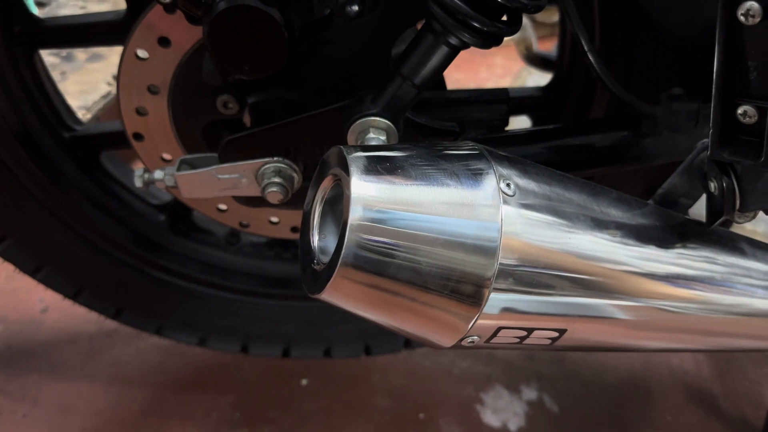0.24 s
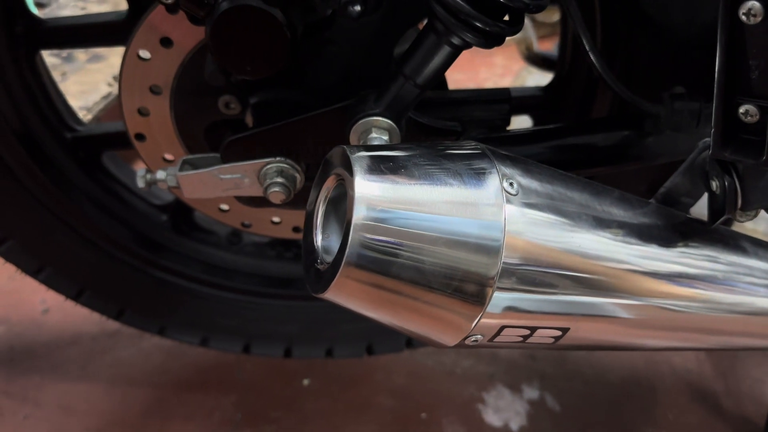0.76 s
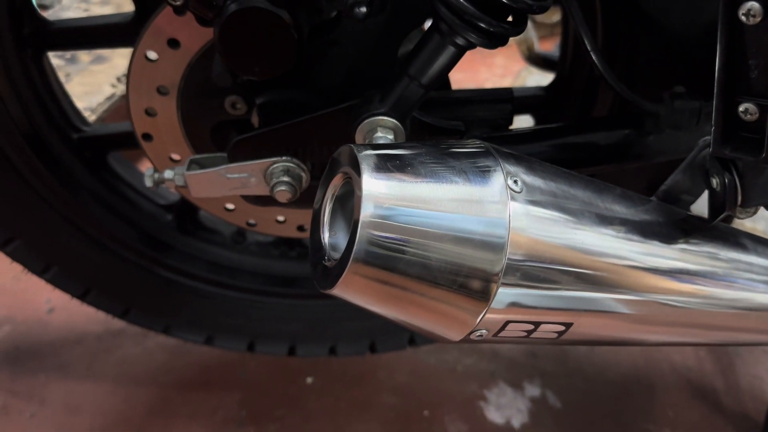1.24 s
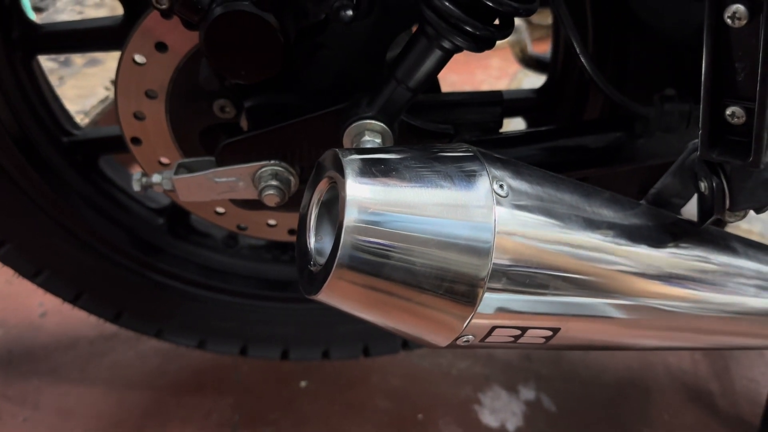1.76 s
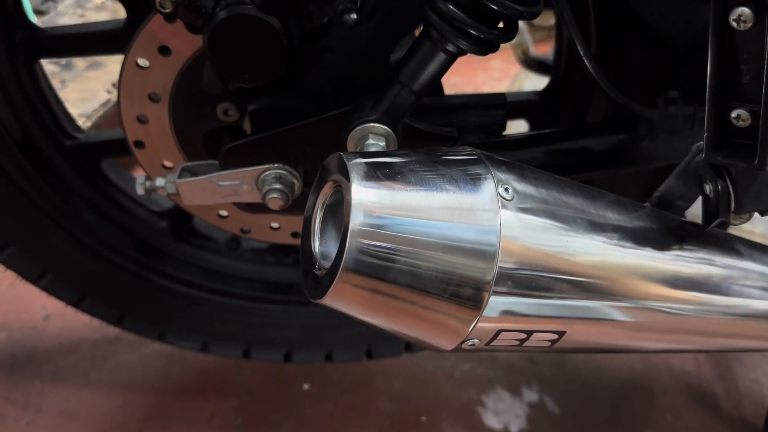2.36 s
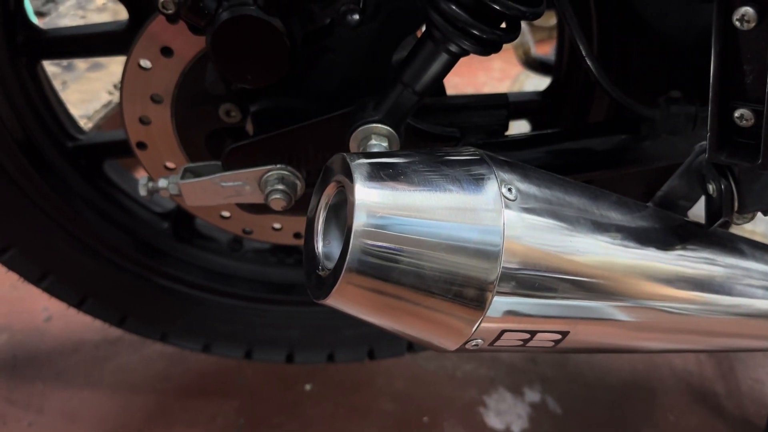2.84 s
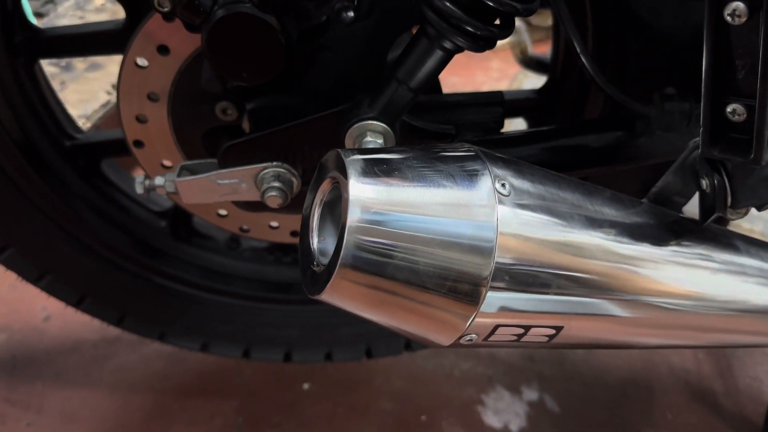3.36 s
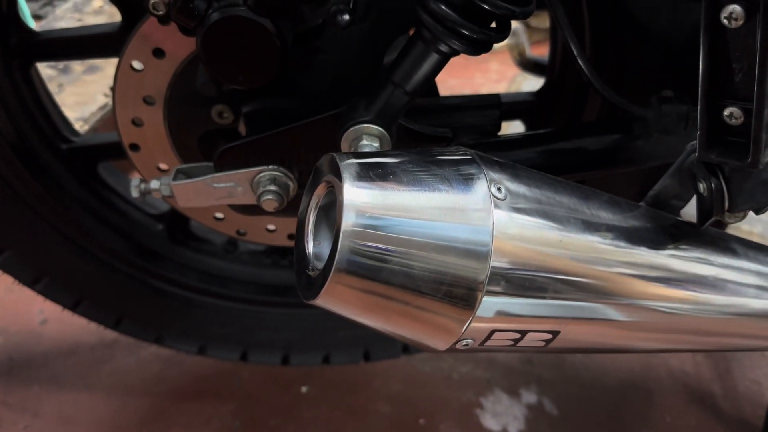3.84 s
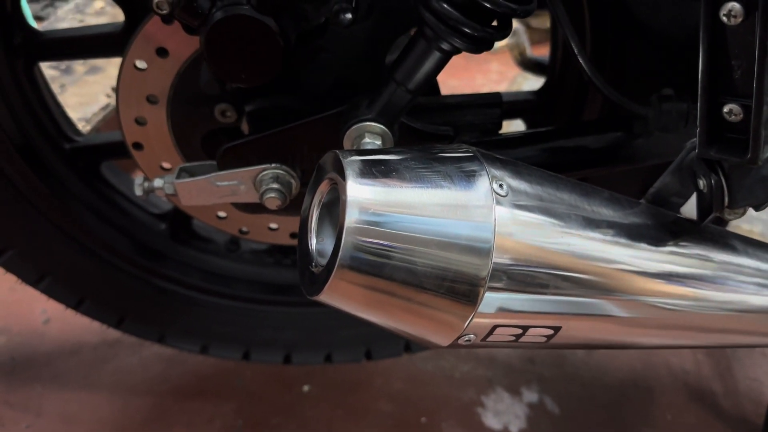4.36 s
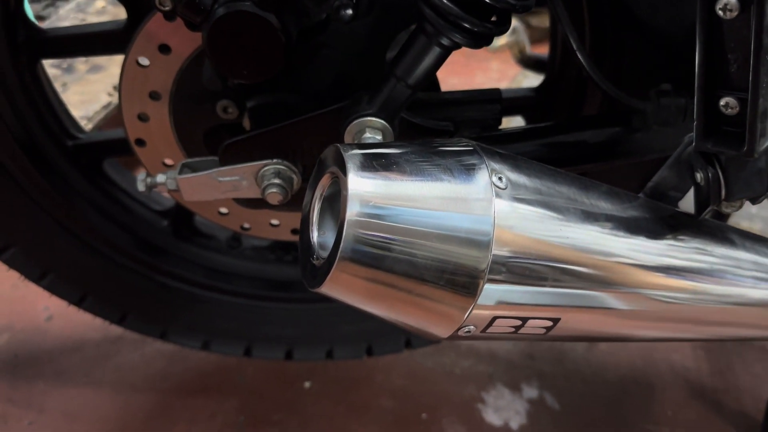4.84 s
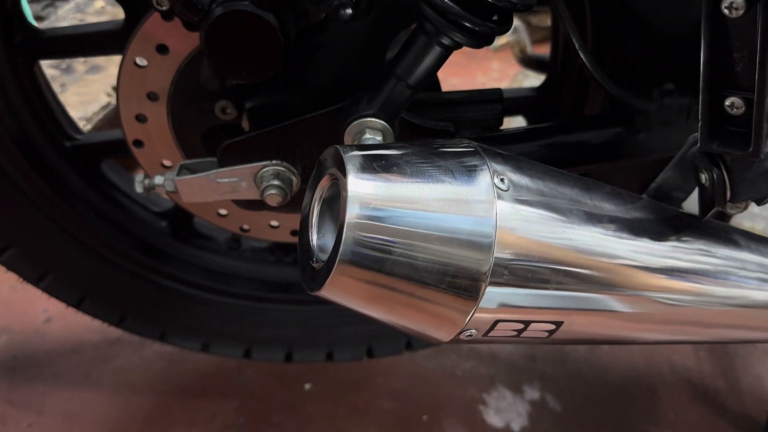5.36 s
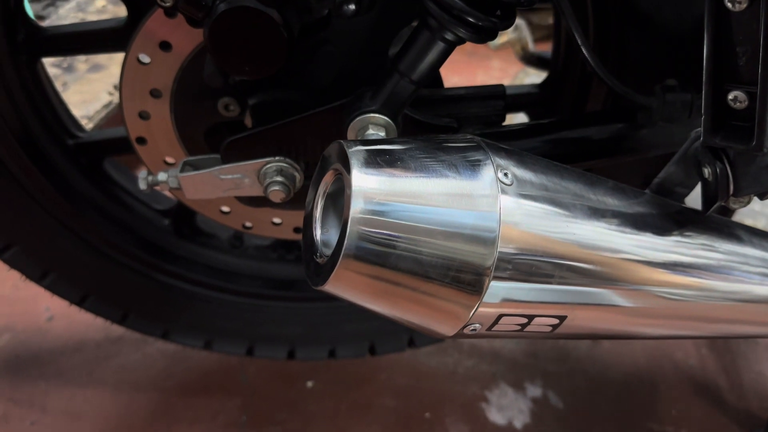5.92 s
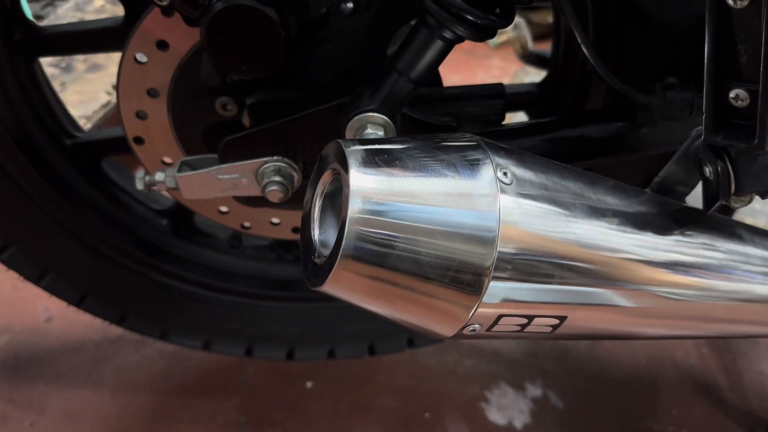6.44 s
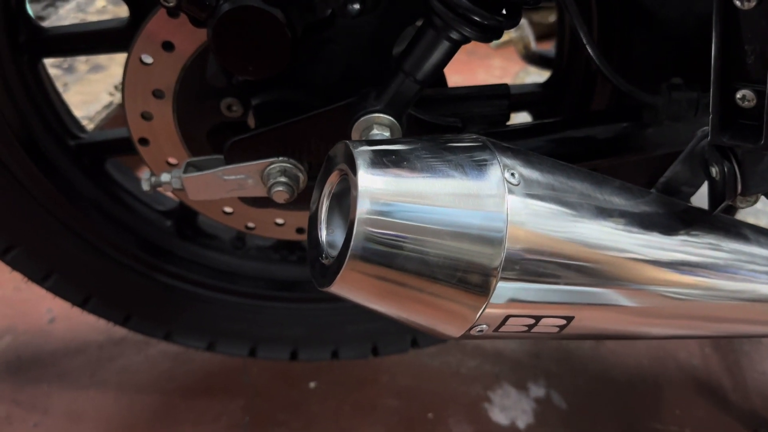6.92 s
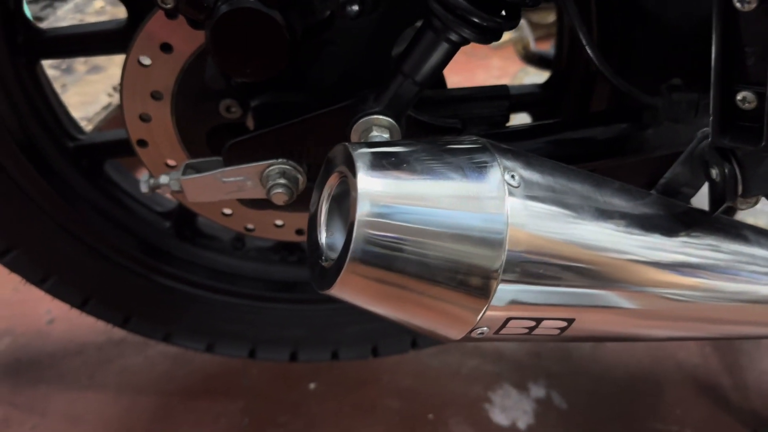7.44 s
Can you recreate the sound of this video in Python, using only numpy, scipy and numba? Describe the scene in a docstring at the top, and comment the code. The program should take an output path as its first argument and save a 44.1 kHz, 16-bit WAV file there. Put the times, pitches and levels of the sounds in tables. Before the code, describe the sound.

A single-cylinder motorcycle exhaust thumps at slow idle, climbs to a steady drumming fast idle, then barks through two quick throttle blips.

```python
"""A single-cylinder motorcycle exhaust ticks over in a workshop, is held at a fast idle, then blipped twice.
Each firing is a blow-down pulse that rings the pipe and silencer; thump and bark return once from the far end.
A slower pumping note and intake gulp lie under it, gas puffs out at each firing and the valve gear rattles.
The walls answer with a short thin tail, without deep bass. A phone by the tailpipe hears it at two ports,
and its bass filters delay the lows so that each thump becomes a falling chirp."""
import sys
import numpy as np
from scipy import signal
from scipy.fft import rfft, irfft
from scipy.io import wavfile
from numba import njit

SR = 44100
rng = np.random.default_rng(int(sys.argv[2]) if len(sys.argv) > 2 else 0)


def output_pcm(signal):
    """Save a mono or channel-first signal as 16-bit PCM at the path in sys.argv[1].

    Samples are clipped to [-1, 1] before scaling.
    """
    pcm = np.clip(np.atleast_2d(signal).T, -1, 1) * 32767
    wavfile.write(sys.argv[1], SR, np.round(pcm).astype(np.int16))


N = 339129

# Engine speed. Each row: time in seconds, firings per second.
SPEED = [(0.0, 13.47), (1.04, 13.24), (1.2, 12.55), (1.39, 14.07), (1.45, 16.6), (1.77, 23.55),
         (2.1, 28.56), (2.59, 28.81), (2.9, 28.32), (3.38, 29.18), (3.87, 28.32), (4.33, 29.55),
         (5.04, 28.61), (5.34, 29.1), (5.91, 28.03), (6.54, 28.62), (6.66, 41.44), (6.77, 54.68),
         (7.1, 38.26), (7.25, 38.8), (7.46, 58.26), (7.56, 65.26), (7.69, 58.53)]
FIRST_FIRING = .26  # share of a cycle before the first firing
FAST_IDLE_HZ, TICKOVER_HZ = 28.7, 15  # firing rates: reference for octaves of speed, upper bound of tick-over
# Each time in seconds marks a lurch where the firings slip late by a share of a cycle.
SLIP_AT_S, SLIP_SHARE, SLIP_TAKES_S = (6.8, 7.594), .24, .04
FIRING_ADVANCE_S = 0.004455  # all firings and puffs are moved this much earlier

# Throttle and levels. Each row: time in seconds, throttle 0-1, exhaust level in dB, valve gear level in dB.
THROTTLE = [(0, 0.05, -1.5, -47), (1.37, 0.09, -1.6, -47.5), (1.45, 0.47, 2.5, -42),
            (1.75, 0.45, 1.5, -45.5), (1.95, 0.48, 2.5, -36), (2.18, 0.31, 1.5, -41.5),
            (3.5, 0.24, 0.63, -42.5), (6.5, 0.26, -2, -45.5), (6.57, 0.63, 0.5, -48),
            (6.68, 0.97, -0.9, -45), (6.77, 0.77, 0.1, -38), (6.83, 0.62, 0.4, -38), (7.08, 0.66, 0, -49),
            (7.19, 0.58, -6.5, -43), (7.3, 0.75, 0.8, -60), (7.45, 0.89, -1, -32), (7.55, 0.75, -1, -33),
            (7.61, 0.71, -2.7, -39), (7.69, 0.57, -0.5, -39)]
# Effect of the throttle. Each row: throttle 0-1, boom in dB, thump in dB, bark in dB, snap in dB,
# gas puff in dB, top of the pulse in Hz, pumping in dB, gulp in dB.
LOAD = [(0, -15, -18, -28.5, -30, -52, 464, -14.5, -37),
        (.3, -18.5, -13.5, -23, -28.5, -49, 569, -19.5, -32),
        (.6, -16, -14.5, -17.5, -26.5, -36, 720, -22.5, -28),
        (1, -12.5, -22.5, -15.5, -15.5, -22.5, 926, -22.5, -3)]

# Spread from firing to firing, as standard deviations: lows in dB, highs in dB, puff in dB, lateness in ms.
SCATTER = (.5, .9, 1.6, .06)
# Misfires and weak firings. Each row: time in seconds, change of lows in dB, of highs in dB, of puff in dB,
# lateness in ms.
MISFIRES = [(.09, -2.5, -15, -5.5, -0.5), (1.065, -6.5, -19, -6, 5), (3.004, -5, -29, -6.5, 1.8),
            (3.592, 0.5, -23, 11.5, 9.5), (3.731, -3.5, -4.5, -13, 4.5), (4.87, -7, -14, -4.5, 6.5),
            (5.563, -5, -28, -10, 3.5), (5.915, -5.5, -5, -11.5, 6), (7.171, 3.5, -32, -1, 7.5),
            (7.584, 7, -31, -7, 8)]
# Alternate firings at tick-over, a strong one after each misfire: lows, highs and puff in dB.
STRONG_DB, WEAK_DB = (2, -2, 7), (1.5, -9.5, 4)
# Firings that spit as the throttle opens. Each row: time in seconds, extra puff in dB.
CRACKS = [(1.653, 5), (1.743, 7), (6.579, 3)]

# Boom mode of the pipe at the fast idle.
BOOM_HZ, BOOM_WIDTH_HZ = 92.54, 21.8
# Silencer modes at the fast idle: thump, bark and snap. Each row: centre in Hz, width in Hz.
SILENCER = [(145, 104.4), (320, 133), (500, 338)]
# Signs of boom, thump, bark and snap: neighbouring modes swing in opposite senses at the outlet.
POLARITY = (-1, 1, -1, 1)
HEAT_PER_OCTAVE = 0.12  # hotter, faster gas raises the modes by this share per octave of speed
SILENCER_RISE = 0.018  # above the fast idle the silencer modes climb only this share per octave
BOOM_DB_PER_OCTAVE, PUMPING_DB_PER_OCTAVE = -14, 9  # above the fast idle pumping takes over from the boom
# Round trip along the pipe: a fixed part, and a part at the fast idle that falls with the square of speed.
TRIP_MS, SLOW_TRIP_MS, RETURN_DB = 16.99, 1.8, -18
NOTCH_HZ, NOTCH_WIDTH_HZ = 229, 21.6  # hollow between thump and bark, at the fast idle
# Hollow, deepest at light throttle. Each row: throttle 0-1, depth 0-1.
HOLLOW = [(0, 0), (.3, .95), (.5, .3), (1, 0)]
# One bounce between the baffles, delay and centre at the fast idle.
BAFFLE_MS, BAFFLE_DB, BAFFLE_HZ, BAFFLE_WIDTH_HZ = 6.294, -7, 540, 174
PUMPING_LAG, GULP_LAG = 0.72, 0.42  # lags in periods, the first at or below the fast idle
PUMPING_LAG_PER_OCTAVE = 0.24  # extra lag in periods above the fast idle
THUD_HZ, THUD_WIDTH_HZ, THUD_DB = 52.9, 15.6, 10.5  # deep thud under the exhaust

# Valve gear spectrum common to both ports. Each row: frequency in Hz, relative level in dB per Hz.
GEAR = [(450, -4), (700, -0.5), (850, -2.5), (1400, -4.5), (1550, 0.5), (1700, -10.5), (2400, -10),
        (2710, -11), (3000, -13.5), (3750, -14.5), (3980, -11), (4250, -15), (6000, -24.5), (7400, -16),
        (8400, -16.5), (9900, -23), (10900, -64.5), (12300, -23.5), (14500, -17.5), (15600, -26.5),
        (16200, -42.5)]
# Valve gear spectrum opposite at the ports. Each row: frequency in Hz, relative level in dB per Hz.
GEAR_SIDE = [(410, -32), (700, 1), (1040, -3.5), (1540, 4.5), (2170, -13.5), (2750, 0), (4410, -38.5),
             (7360, -15), (8620, -25.5), (11400, -11), (16200, -29)]
# Valve events. Each row: place in the cycle 0-1, relative strength.
TAPPETS = [(.45, .4), (.82, .6)]
# Gas spectrum common to both ports. Each row: frequency in Hz, relative level in dB per Hz.
GAS = [(530, -58.5), (900, -5), (1510, -12.5), (1630, -17.5), (1860, -9.5), (2150, -14.5), (2740, -13.5),
       (3450, -21.5), (8430, -24), (10600, -42.5), (14500, -16.5), (16200, -41.5)]
# Gas spectrum opposite at the ports. Each row: frequency in Hz, relative level in dB per Hz.
GAS_SIDE = [(530, -36), (900, 3), (1250, -0.5), (2100, -3.5), (2810, -2.5), (4340, -8.5), (4780, -10.5),
            (7290, -10), (8430, -26.5), (11400, -7.5), (16200, -40.5)]
PUFF_SHARE, PUFF_RISE, STREAM = 0.25, 0.068, 0.075  # decay and rise in cycles; steady flow under the puffs

SHOP_T60_S, SHOP_DB = .5, -14
# Port imbalance. Each row: frequency in Hz, left minus right in dB.
LEAN = [(60, .4), (125, .6), (250, 1), (500, 2.2), (1400, 1.5), (2800, 3), (5500, 4.5), (9000, .4),
        (16000, .2)]
BASS_CUT_HZ, TOP_HZ = 56, 15800
# Corner of each all-pass stage in Hz.
SMEAR_HZ = (103, 142, 300, 308)


def undb(db):
    """Amplitude gain follows from decibels as a power of ten."""
    return 10 ** (np.asarray(db) / 20)


def level(x, db):
    """Normalisation by the root mean square sets the level of a signal."""
    return x * undb(db) / np.sqrt(np.mean(x ** 2))


def curve(table, x):
    """Linear interpolation reads every column of a table at x along its first column."""
    at, *columns = np.transpose(table)
    return [np.interp(x, at, c) for c in columns]


def on_hz(table):
    """Interpolation over log frequency reads a spectrum at every FFT bin."""
    hz, value = np.transpose(table)
    return np.interp(np.log(np.fft.rfftfreq(N, 1 / SR) + 1), np.log(hz + 1), value)


def coloured(table, x):
    """Multiplication of the spectrum by a gain curve colours a signal."""
    return irfft(rfft(x) * undb(on_hz(table)), N)


@njit
def svf(x, hz, width, low):
    """Two coupled integrators resonate at a moving centre: band-pass at low 0, low-pass at low 1."""
    y, b, l = np.empty(len(x)), 0., 0.
    for i in range(len(x)):
        g, k = np.tan(np.pi * hz[i] / SR), width[i] / hz[i]
        v = (b + g * (x[i] - l)) / (1 + g * (g + k))
        y[i] = low * (l + g * v) + (1 - low) * k * v
        b, l = 2 * v - b, l + 2 * g * v
    return y


def resonance(x, hz, width):
    """A single mode passes a band of constant width about its fixed or moving centre."""
    return svf(x, hz + np.zeros(N), width + np.zeros(N), 0.)


def train(times, sizes):
    """Impulses excite a resonator at each given time."""
    at = np.round(times * SR).astype(int)
    ok = (at >= 0) & (at < N)
    return np.bincount(at[ok], sizes[ok], N) + 1e-18


def crank():
    """Integrated speed gives the cycle phase; each whole cycle fires once, with its own row of changes."""
    t = np.arange(N) / SR
    slip = sum(np.clip((t - s) / SLIP_TAKES_S + .5, 0, 1) for s in SLIP_AT_S)
    cycles = np.cumsum(curve(SPEED, t)[0]) / SR + 1 - FIRST_FIRING - SLIP_SHARE * slip
    times = np.interp(np.arange(int(cycles[-1]) + 1), cycles, t)
    times[0] = times[1] - 1 / SPEED[0][1]
    change = rng.standard_normal((len(times), 4)) * SCATTER
    missed = [np.argmin(abs(times - s)) for s, *_ in MISFIRES]
    for k in np.flatnonzero(curve(SPEED, times)[0] < TICKOVER_HZ):
        since = k - max([0] + [m for m in missed if m < k])
        change[k, :3] += STRONG_DB if since % 2 else WEAK_DB
    for k, (s, *row) in zip(missed, MISFIRES):
        change[k] = row
    for s, db in CRACKS:
        change[np.argmin(abs(times - s)), 2] += db
    return cycles % 1, times - FIRING_ADVANCE_S + change[:, 3] / 1000, change


def shop(x):
    """Diffuse reflection from the walls is a decaying noise tail without deep bass, independent at each port."""
    t = np.arange(int(.5 * SR)) / SR
    tail = rng.standard_normal((2, len(t))) * undb(-60 * t / SHOP_T60_S) * (t > .006)
    tail = signal.sosfilt(signal.butter(1, 220, "high", fs=SR, output="sos"), tail)
    wet = signal.fftconvolve(x[None], tail, axes=1)[:, :N]
    return wet * undb(SHOP_DB) / np.sqrt(np.mean(np.sum(tail ** 2, axis=1)))


def ports(common, opposite, side_db, envelope):
    """Partly coherent noise at two ports is a shared part plus a part of opposite sign."""
    mid = level(coloured(common, envelope * rng.standard_normal(N)), 0)
    side = level(coloured(opposite, envelope * rng.standard_normal(N)), 0)
    return mid + undb(side_db) * side * np.array([[1], [-1]])


def valve_gear(phase):
    """Mechanical contact noise rustles steadily and swells into a tick at each valve event."""
    t = np.arange(N) / SR
    gear_db = curve(THROTTLE, t)[2]
    ticks = 1 + sum(g * np.exp(-((phase - at) % 1) / .08) for at, g in TAPPETS)
    return ports(GEAR, GEAR_SIDE, -1.0, ticks) * undb(gear_db)


def gas_puffs(times, change):
    """Turbulent outflow makes noise that rises and decays over a share of each cycle, longer at low speed."""
    t = np.arange(N) / SR
    throttle, level_db, _ = curve(THROTTLE, t)
    opening = times - change[:, 3] / 1000  # the valve opens on time even when the charge burns late
    last = np.clip(np.searchsorted(opening, t) - 1, 0, None)
    age = np.clip(t - opening[last], 0, None) * curve(SPEED, t)[0]  # in cycles
    puff = undb(change[last, 2]) * np.exp(-age / PUFF_SHARE) * (1 - np.exp(-age / PUFF_RISE))
    return ports(GAS, GAS_SIDE, -1.3, puff + STREAM) * undb(curve(LOAD, throttle)[4] + level_db)


def pumping_and_gulp(phase, pumping_db, gulp_db, above):
    """Periodic displacement makes tones: the piston shoves gas each crank turn, the intake gulps each cycle."""
    lag = PUMPING_LAG + PUMPING_LAG_PER_OCTAVE * above
    pumping_gain = undb(pumping_db + PUMPING_DB_PER_OCTAVE * above)
    pumping = pumping_gain * np.sin(2 * np.pi * (2 * phase - lag))  # two crank turns a cycle
    return pumping + undb(gulp_db) * np.sin(2 * np.pi * (phase - GULP_LAG))


def pipe_modes(times, change, throttle, level_db, heat, box, above):
    """Impulsive excitation rings the pipe and three silencer modes; thump and bark reflect once."""
    t = np.arange(N) / SR
    rate = curve(SPEED, times)[0]
    back = times + (TRIP_MS + SLOW_TRIP_MS * (FAST_IDLE_HZ / rate) ** 2) / 1000
    per_blow = 1 / np.sqrt(rate)  # more blows a second share the power
    columns = curve(LOAD, np.interp(times, t, throttle))[:4] + np.interp(times, t, level_db)
    columns[0] += BOOM_DB_PER_OCTAVE * np.interp(times, t, above)
    out = 0
    for k, ((hz, width), db) in enumerate(zip([(BOOM_HZ, BOOM_WIDTH_HZ)] + SILENCER, columns)):
        def ring(size):
            x = train(times, size)
            if k in (1, 2):
                x = x + train(back, size * undb(RETURN_DB))
            for _ in range(2):  # the modes fall off steeply on both sides
                x = resonance(x, hz * (box if k else heat), width)
            return x
        unit = np.sqrt(np.mean(ring(per_blow) ** 2))
        strength = undb(db + change[:, k // 2])  # lows drive boom and thump, highs bark and snap
        out = out + POLARITY[k] * ring(per_blow * strength) / unit
    return out


def exhaust(phase, times, change):
    """Blow-down pulses excite modes that rise with gas speed; gradual valve opening rounds their edges."""
    t = np.arange(N) / SR
    throttle, level_db, _ = curve(THROTTLE, t)
    top_hz, pumping_db, gulp_db = curve(LOAD, throttle)[5:]
    octaves = np.log2(curve(SPEED, t)[0] / FAST_IDLE_HZ)
    above = np.clip(octaves, 0, None)
    heat = 1 + HEAT_PER_OCTAVE * octaves
    box = heat - (HEAT_PER_OCTAVE - SILENCER_RISE) * above
    out = pipe_modes(times, change, throttle, level_db, heat, box, above)
    for damping in (1.93, 1.41, .52):
        out = svf(out, top_hz, damping * top_hz, 0.98)
    depth = np.clip(curve(HOLLOW, throttle)[0], 0, 1)
    out = out - depth * resonance(out, NOTCH_HZ * heat, NOTCH_WIDTH_HZ)
    bounce = resonance(out, BAFFLE_HZ * heat, BAFFLE_WIDTH_HZ)
    out = out + undb(BAFFLE_DB) * np.interp(t - BAFFLE_MS / heat / 1000, t, bounce)
    tones = pumping_and_gulp(phase, pumping_db + level_db, gulp_db + level_db, above)
    thud = undb(THUD_DB) * resonance(out, THUD_HZ, THUD_WIDTH_HZ)
    return out + tones + thud


def scene():
    """Path difference brings the exhaust to the left port two samples early; the ports also differ in tone."""
    phase, times, change = crank()
    pipe = exhaust(phase, times, change)
    early = np.r_[pipe[2:], 0, 0]
    both = np.array([early, pipe]) + shop(pipe) + valve_gear(phase) + gas_puffs(times, change)
    return irfft(rfft(both) * undb(on_hz(LEAN) * np.array([[.5], [-.5]])), N)


def record(dry):
    """Phase dispersion by a bass cut and all-pass stages delays the lows; peaks saturate and the top is cut."""
    x = signal.sosfilt(signal.butter(4, BASS_CUT_HZ, "high", fs=SR, output="sos"), dry)
    for hz in SMEAR_HZ:
        pole = np.exp(-2 * np.pi * hz / SR)
        x = signal.lfilter([pole, -1], [1, -pole], x)
    x = np.tanh(.85 * x) / .85
    return signal.sosfilt(signal.ellip(8, .2, 70, TOP_HZ, fs=SR, output="sos"), x)


dry = scene()
out = record(dry)
output_pcm(out)
```